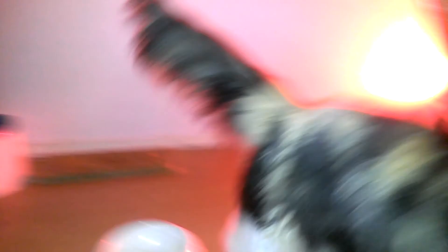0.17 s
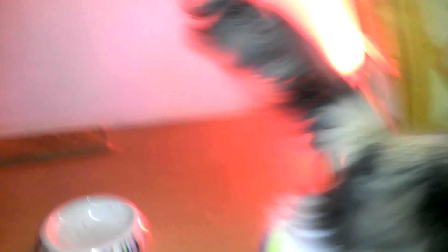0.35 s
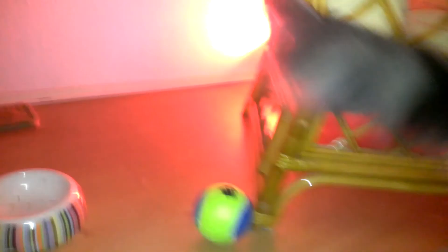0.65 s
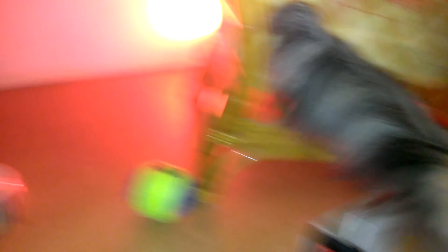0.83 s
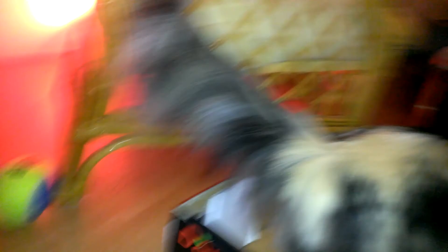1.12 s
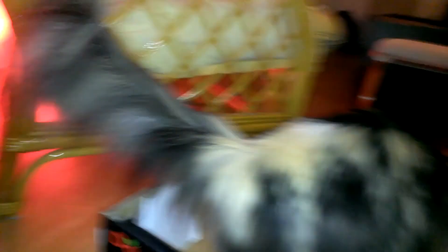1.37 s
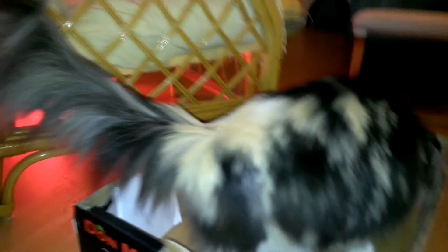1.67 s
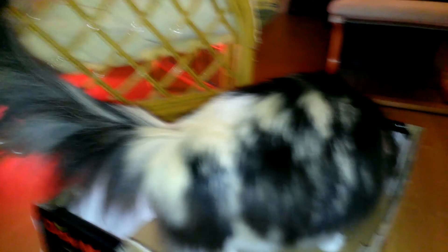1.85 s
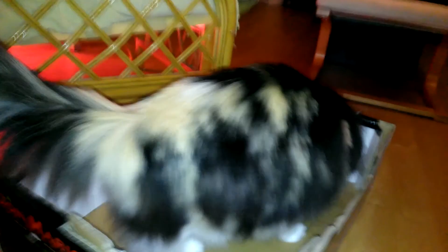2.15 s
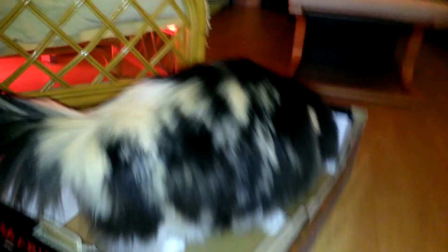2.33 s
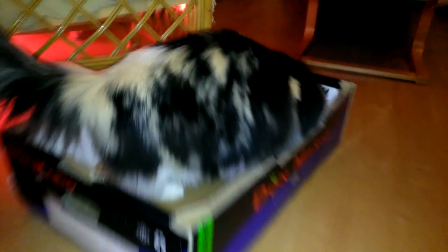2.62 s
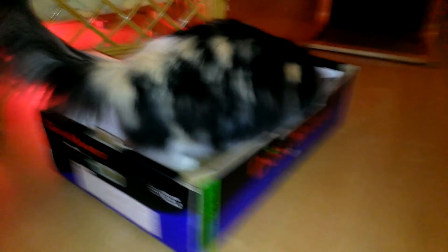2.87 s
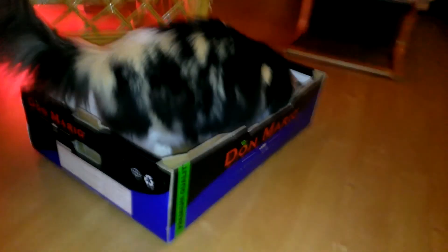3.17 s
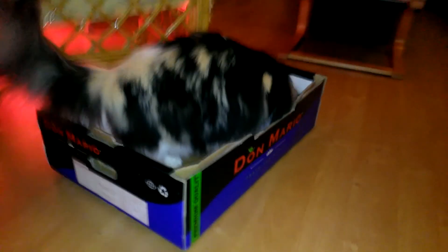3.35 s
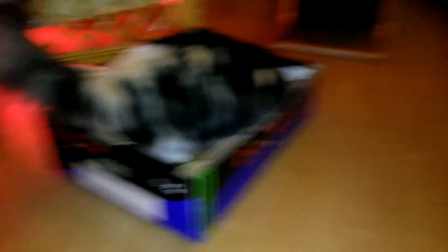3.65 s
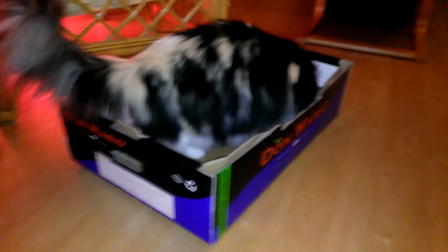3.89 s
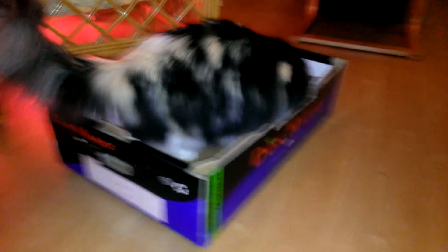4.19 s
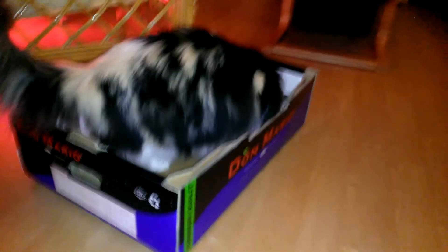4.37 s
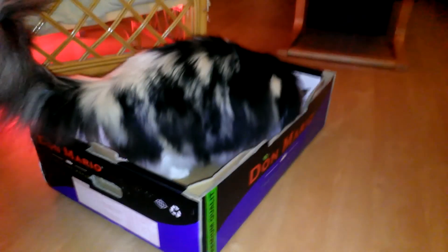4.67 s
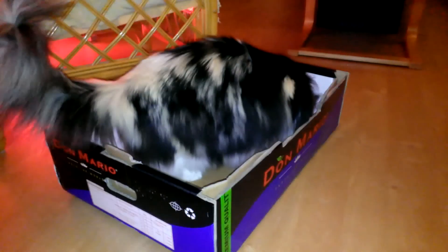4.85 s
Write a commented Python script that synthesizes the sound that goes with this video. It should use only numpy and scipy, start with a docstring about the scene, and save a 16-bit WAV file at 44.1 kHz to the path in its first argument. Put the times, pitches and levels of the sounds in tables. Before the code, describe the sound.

Short dry paw scrapes and cardboard edge clicks crowd the first half second, before a heavy scraping drag peaks at about one second with soft low knocks. Afterwards it is mostly quiet brushing, with little scratchy bursts and a clear snap later on. Close, cheap handheld microphone, rumbling casing, steady indoor hiss and weak hum.

```python
"""A quiet room with a hard floor: a cat climbs into a cardboard box close to a small hand-held camera.
Paws scrape the board in short strokes of slipping fibres, fur brushes as soft noise, and edges click and ring.
One long drag crosses the rim; rumble, jolts and soft knocks reach the microphone through the casing.
Room hiss, hum and a faint whistle lie behind. The camera's own hiss and whine pass a noise suppressor
that opens on bright sound."""
import sys
import numpy as np
from scipy import signal
from scipy.fft import rfft, irfft, next_fast_len
from scipy.io import wavfile
from scipy.ndimage import uniform_filter1d, map_coordinates

SR = 44100
rng = np.random.default_rng(int(sys.argv[2]) if len(sys.argv) > 2 else 0)


def dump_mix(stems):
    """Bounce the given channels to the path in sys.argv[1] as a 16-bit WAV at rate SR."""
    frames = np.atleast_2d(stems).T  # one column per channel
    limited = np.clip(frames, -1, 1)  # hard clip at full scale
    pcm = np.round(limited * 32767).astype(np.int16)
    wavfile.write(sys.argv[1], SR, pcm)


N = 220896  # length in samples


def amp(db):
    """Decibels to amplitude."""
    return 10 ** (np.asarray(db) / 20)


def unit(x):
    """x scaled to rms 1."""
    return x / np.sqrt(np.mean(x ** 2) + 1e-20)


def along(points, hz):
    """Value at hz between (Hz, value) points on a log frequency axis."""
    f, v = np.transpose(points)
    return np.interp(np.log(hz + 1), np.log(f + 1), v)


def curves(rows):
    """One value per sample for each column after the time."""
    s, *cols = np.transpose(rows)
    return [np.interp(np.arange(N) / SR, s, c) for c in cols]


def wobble(rate, size=N):
    """A smooth random curve, rate knots a second."""
    knots = rng.standard_normal(int(size * rate / SR) + 4)
    return map_coordinates(knots, [np.arange(size) * rate / SR])


def filtered(x, response):
    """x times a complex response of frequency."""
    m = next_fast_len(len(x) + SR // 4)
    spectrum = rfft(x, m) * response(np.fft.rfftfreq(m, 1 / SR))
    return irfft(spectrum, m)[:len(x)]


def peak(f, hz, width_hz):
    """A causal resonance of gain 1."""
    return 1j * f * width_hz / (hz * hz - f * f + 1j * f * width_hz)


def noise(spectrum):
    """Coloured noise of rms 1."""
    return unit(filtered(rng.standard_normal(N), lambda f: amp(along(spectrum, f))))


def tone(hz, wander_hz, db):
    """A steady line whose pitch wanders a little."""
    cycles = np.cumsum(hz + wander_hz * wobble(25)) / SR
    return amp(db) * np.sqrt(2) * np.sin(2 * np.pi * cycles)


# colour of the room hiss: f/Hz, relative level/dB per Hz
ROOM_COLOUR = [(100, 22), (300, -12), (800, 8.5), (2500, 3.5), (5000, -3), (6300, -2.5), (8000, -17),
               (12000, -29), (16000, -27)]
# hum and a faint whistle: f/Hz, wander/Hz, level/dB
ROOM_TONES = [(48.4, 5, -58), (150, 4, -72), (199.4, 3, -67), (251, 4, -73), (8000, 25, -91)]


def room():
    """Steady broadband hiss with wandering sine lines for hum and whistle."""
    hiss = amp(-61) * noise(ROOM_COLOUR)
    return hiss + sum(tone(*line) for line in ROOM_TONES)


# slow brushing of the coat: t/s, level/dB before flicker
FUR_LEVEL = [(0.0, -61.5), (0.17, -62.5), (0.44, -52), (0.6, -63), (0.88, -51), (1.0, -58), (1.18, -54),
             (1.51, -52.5), (1.69, -55.5), (1.97, -53.5), (2.3, -46.5), (2.38, -44), (2.62, -53.5),
             (3.0, -65), (3.47, -53.5), (3.7, -58.5), (4.13, -69.5), (4.48, -61), (5.01, -78)]
# colour of the brushing: f/Hz, relative level/dB per Hz
FUR_COLOUR = [(200, -10), (700, -14), (1900, -3), (2900, -6.5), (4100, -2.5), (5200, -11), (8000, -35),
              (16000, -54)]


def fur():
    """The coat brushes the walls: soft dense noise that breathes slightly."""
    level_db, = curves(FUR_LEVEL)
    flicker_db = 0.28 * wobble(10) + 0.88 * wobble(300)
    return amp(level_db + flicker_db) * noise(FUR_COLOUR)


# rumble of the holding hand: t/s, level/dB
HAND_LEVEL = [(0, -60), (.09, -51), (.13, -48), (.3, -48), (.43, -52), (.75, -49), (.9, -43), (1.1, -52),
              (1.5, -56.5), (1.85, -56.5), (2.47, -57), (2.87, -59.5), (3.62, -52), (3.94, -57),
              (4.35, -54), (5.01, -59)]
# colour of the hand rumble: f/Hz, relative level/dB per Hz
RUMBLE_COLOUR = [(5, -27), (20, -4), (45, -11), (70, -12.5), (120, -84)]
# jolts of the casing: t/s of the peak, peak level/dB before the lumps
JOLTS = [(0.125, -36.5), (0.268, -51), (0.327, -41.5), (0.383, -48), (0.469, -39.5), (0.549, -45),
         (.69, -44.5), (1.486, -48)]
# colour of thuds in the casing, also under the drag: f/Hz, relative level/dB per Hz
THUD_COLOUR = [(50, -58), (76, -0.5), (100, 1.5), (150, -2.5), (300, -4.5), (600, -8.5), (1500, -43.5)]
JOLT_RISE_S, JOLT_T60_S, CASING_REST_DB = 0.012, 0.33, -63


def body():
    """Low sound carried through the hand and the casing, in lumps; each jolt swells fast and dies away."""
    rumble_db, = curves(HAND_LEVEL)
    t = np.arange(N) / SR
    thud = amp(CASING_REST_DB)
    for s, db in JOLTS:
        swell = np.clip(1 + (t - s) / JOLT_RISE_S, 0, 1)
        thud = thud + swell * amp(db - 60 * np.maximum(t - s, 0) / JOLT_T60_S)
    lumps = amp(2.28 * wobble(40))
    return amp(rumble_db) * noise(RUMBLE_COLOUR) + thud * lumps * noise(THUD_COLOUR)


# strokes on the board: t/s, rise/s, hold/s, fall/s, level/dB before the grip,
# board resonance f/Hz, bright hiss level/dB relative to the board
STROKES = [(0.116, 0.0026, 0.0053, 0.031, -35.5, 440, -6.5), (0.152, 0.0074, 0.0054, 0.018, -40, 2430, 1.5),
           (0.17, 0.002, 0.016, 0.15, -52, 850, 4), (0.314, 0.0039, 0.016, 0.055, -54.5, 1174, 9),
           (0.389, 0.0053, 0.015, 0.016, -44, 900, 1.5), (.454, 0.0033, 0.0022, 0.0056, -24.5, 2700, -1),
           (0.463, 0.0043, 0.0068, 0.0086, -27.5, 3830, -5.5),
           (0.478, 0.0023, 0.024, 0.23, -56.5, 1490, 17), (0.532, 0.015, 0.031, 0.068, -46, 506, -1.5),
           (0.658, 0.0042, 0.023, 0.041, -37, 4360, -5.5), (0.688, 0.023, 0.032, 0.055, -48.5, 804, 7.5),
           (1.494, 0.037, 0.036, 0.14, -50, 845, -1.5), (2.794, 0.027, 0.16, .05, -57.5, 1720, 6),
           (2.868, 0.079, 0.013, 0.075, -50, 1440, 7), (2.973, 0.011, 0.041, 0.12, -58, 3940, 4.5),
           (3.233, 0.021, 0.047, .03, -58, 3700, -19), (3.283, 0.026, 0.067, .02, -49, 2420, -7.5),
           (3.338, 0.026, 0.015, 0.047, -48, 2370, 7), (3.396, 0.023, 0.027, 0.015, -56, 2780, 6.5),
           (3.48, 0.0027, 0.018, 0.015, -44.5, 2800, 0.5), (3.513, 0.0038, 0.044, 0.012, -58.5, 2750, 11),
           (3.549, 0.012, 0.068, 0.014, -43.5, 2500, 1.5), (3.931, 0.0019, 0.027, 0.07, -47, 3340, -4),
           (4.021, 0.065, 0.038, 0.024, -54.5, 2080, -1.5), (4.281, 0.0024, 0.016, 0.0094, -53.5, 2550, -5),
           (4.34, 0.0027, 0.0047, 0.0066, -56, 3030, -1), (4.356, 0.0099, 0.058, .015, -56.5, 2540, 1.5),
           (4.408, 0.029, 0.021, 0.01, -48.5, 4260, 2), (4.875, 0.0029, 0.015, 0.015, -55, 2080, 1.5),
           (4.922, 0.007, 0.046, 0.017, -52.5, 1950, 2)]
# colour of the bright hiss, also in the drag: f/Hz, relative level/dB per Hz
HISS_COLOUR = [(300, -15), (1500, -14.5), (3300, -6), (4300, -2), (5300, -9.5), (7000, -19), (8500, -23),
               (11000, -33), (16000, -40)]
# colour of the hiss in a corner of the box: f/Hz, relative level/dB per Hz
CORNER_HISS_COLOUR = [(500, -45), (1500, -20), (2600, -11), (3400, -17), (4350, 0), (5200, -13), (6350, -8),
                      (7200, -16), (8200, -28), (16000, -42)]
# spells with the paws in a corner: start t/s, end t/s
CORNER_SPELLS = [(3.2, 3.7), (4.2, 4.4)]
BOARD_WIDTH_HZ, WIDTH_PER_HZ = 800, 0.29  # board resonance: wider when higher
CORNER_WIDTH_HZ = 800


def strokes():
    """Each stroke is a run of fibre slips that sounds the board and hisses; the grip catches and lets go."""
    out, size = np.zeros(N + SR), SR // 4
    t = np.arange(size) / SR
    for s, rise, hold, fall, db, hz, hiss_db in STROKES:
        slips = rng.standard_normal(size) * amp(2.0 * wobble(700, size=size))
        # while the paws work in a corner, its close walls give sharper bands
        corner = any(a < s < b for a, b in CORNER_SPELLS)
        width_hz = CORNER_WIDTH_HZ if corner else BOARD_WIDTH_HZ + WIDTH_PER_HZ * hz
        colour = CORNER_HISS_COLOUR if corner else HISS_COLOUR
        board = unit(filtered(slips, lambda f: peak(f, hz, width_hz) ** 2))
        # reversed slips keep the hiss from following the board grain for grain
        hiss = unit(filtered(slips[::-1], lambda f: amp(along(colour, f))))
        press = np.clip(np.minimum(t / rise, 1 + (rise + hold - t) / fall), 0, 1) ** 1.13
        grip_db = 1.8 * wobble(110, size=size)
        scrape = board + amp(hiss_db) * hiss
        out[round(s * SR):][:size] += amp(db + grip_db) * press * scrape
    return out[:N]


# edge clicks: t/s, soft push peak level/dB, snap level/dB
CLICKS = [(0.122, -60, -39), (0.33, -14, -17.5), (0.342, -28, -34), (0.3817, -22.5, -5),
          (0.396, -20.5, -30), (0.467, -22.5, -38), (0.477, -26, -37), (1.278, -38.5, -37),
          (2.497, -62, -30.5), (3.44, -62, -39), (4.244, -43, -55), (4.3573, -68, -13.5),
          (4.424, -38.5, -23.5)]
# modes of the box edge: f/Hz, relative level/dB, t60/s
EDGE_MODES = [(1150, -23, 0.012), (1954, -9, 0.0054), (2470, -7, 0.0058), (3970, -17, 0.025),
              (4450, -11, 0.02), (6080, -6, 0.0033)]
PUSH_S, SNAP_RISE_S = 0.00023, 0.00022
RING_DB = -5  # edge ring within the snap


def clicks():
    """A soft push on the wall, and a snap: a dry crack that rings the edge briefly at new strengths."""
    out, t = np.zeros(N + SR), np.arange(SR // 20) / SR
    push = (t / PUSH_S * np.exp(1 - t / PUSH_S)) ** 2
    onset = 1 - np.exp(-t / SNAP_RISE_S)
    for s, push_db, snap_db in CLICKS:
        ring = np.zeros(len(t))
        chance_db = rng.normal(0, 2, len(EDGE_MODES))
        for (hz, db, t60), more in zip(EDGE_MODES, chance_db):
            ring += amp(db + more - 60 * t / t60) * np.sin(2 * np.pi * hz * t)
        burst = amp(-60 * t / 0.0063) * rng.standard_normal(len(t))
        crack = filtered(burst, lambda f: peak(f, 1870, 3330) ** 2)
        snap = (amp(RING_DB) * ring + crack) * onset
        out[round(s * SR):][:len(t)] += amp(push_db) * push + amp(snap_db) * snap
    return out[:N]


# the long drag over the rim: t/s, board level/dB, board resonance f/Hz, bright hiss level/dB, thud level/dB
DRAG = [(0.769, -60, 2600, -71, -57), (.80, -50.5, 2570, -46, -46.5), (0.847, -36.5, 2270, -39, -38.5),
        (.875, -33.5, 1840, -45.5, -39.5), (.9, -39, 1190, -46, -34), (0.924, -35, 1030, -68, -31.5),
        (0.946, -23.5, 1330, -56, -22), (0.986, -41, 900, -82, -33.5), (1.017, -28.5, 850, -78, -23.5),
        (1.044, -15, 1650, -67, -15.5), (1.059, -16.5, 2600, -30, -32.5), (1.065, -39, 4200, -28, -37),
        (1.081, -50, 4580, -34.5, -53), (1.092, -77, 4500, -82, -73)]
DRAG_GRAIN_DB = 2.2
DRAG_WIDTH_HZ, DRAG_WIDTH_PER_HZ = 1300, 0.21


def drag():
    """One long stroke over the rim: the board's resonance glides, and the weight thuds into the casing."""
    level_db, hz, hiss_db, thud_db = curves(DRAG)
    slips = unit(rng.standard_normal(N) * amp(DRAG_GRAIN_DB * wobble(500)))
    # the gliding resonance shapes each short frame, evened to the same power
    f, t, z = signal.stft(slips, SR, nperseg=256)
    hz = np.interp(t * SR, np.arange(N), hz)
    gain = np.abs(peak(f[:, None], hz, DRAG_WIDTH_HZ + DRAG_WIDTH_PER_HZ * hz)) ** 2
    even_gain = gain / np.sqrt(np.mean(gain ** 2, axis=0))
    board = signal.istft(z * even_gain, SR, nperseg=256)[1][:N]
    hiss = unit(filtered(slips, lambda f: amp(along(HISS_COLOUR, f))))
    start, end = DRAG[0][0], DRAG[-1][0]
    on = np.abs(np.arange(N) / SR - (start + end) / 2) < (end - start) / 2
    return on * (amp(level_db) * board + amp(hiss_db) * hiss + amp(thud_db) * noise(THUD_COLOUR))


# soft knocks on the casing: t/s, swing level/dB before the rebound's growth
THUMPS = [(0.926, -26), (1.027, -16), (3.759, -38)]
THUMP_S, THUMP_SWELL = 0.0257, 0.27  # one swing in and out; how much the rebound outgrows the dip


def thumps():
    """The casing swings in and out once for each knock."""
    out, t = np.zeros(N), np.arange(N) / SR
    for s, db in THUMPS:
        v = np.clip((t - s) / THUMP_S, 0, 1)
        out -= amp(db) * np.sin(2 * np.pi * v) * (1 + THUMP_SWELL * (2 * v - 1))
    return out


def scene():
    """Room, cat, box and casing together at the microphone."""
    return (room() + fur() + body() + strokes() + clicks() + drag() + thumps())[None]


# microphone port resonances: f/Hz, width/Hz, boost level/dB
PORT = [(3930, 920, 2.5)]
# colour of the electronics' hiss: f/Hz, relative level/dB per Hz
CIRCUIT_COLOUR = [(4000, -34), (8000, -3), (12000, -7), (16000, -26)]
WHINE_HZ, TOP_HZ = 12845, 15740
OVERLOAD = 0.6  # amplitude that the soft overload approaches


def record(dry):
    """Port resonance, soft overload, the electronics' own hiss and whine behind a suppressor, and the band limit."""
    def port(f):
        return np.prod([1 + (amp(db) - 1) * peak(f, hz, w) for hz, w, db in PORT], axis=0)

    x = filtered(dry[0], port)
    x = x / (1 + np.abs(x / OVERLOAD) ** 4) ** (1 / 4)
    # levels with the suppressor fully open
    own = amp(-68.5) * noise(CIRCUIT_COLOUR) + tone(WHINE_HZ, wander_hz=8, db=-59)
    # the suppressor opens quickly with the bright sound that arrives and closes more slowly
    bright = filtered(x, lambda f: peak(f, 10100, 3700) ** 2)
    power = filtered(bright ** 2, lambda f: 1 / (1 + 2j * np.pi * f * 0.02))
    power_db = 10 * np.log10(np.abs(power) + 1e-12)
    open_db = np.clip(0.86 * (power_db + 60), -24, 0)
    heard = x + amp(uniform_filter1d(open_db, size=700)) * own
    return filtered(heard, lambda f: (f < TOP_HZ) * 1.0)[None]


dry = scene()
out = record(dry)
dump_mix(out)
```